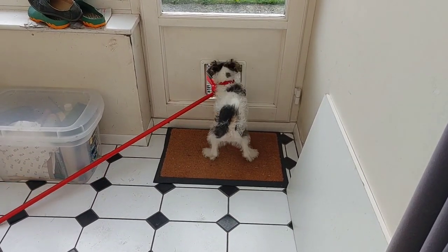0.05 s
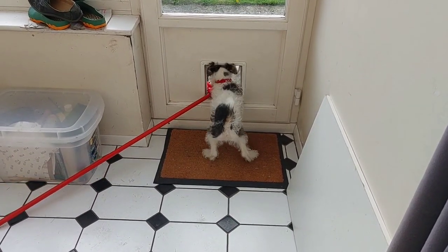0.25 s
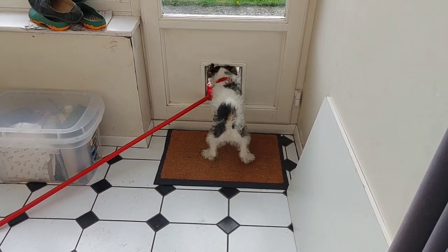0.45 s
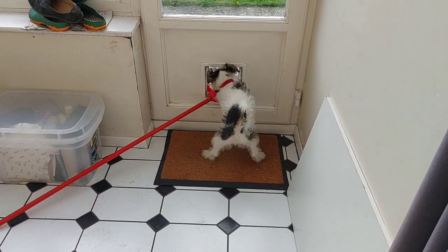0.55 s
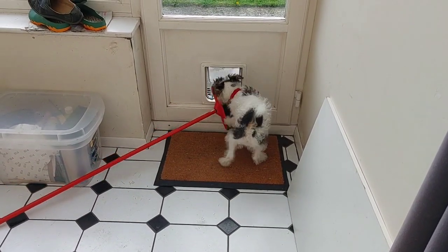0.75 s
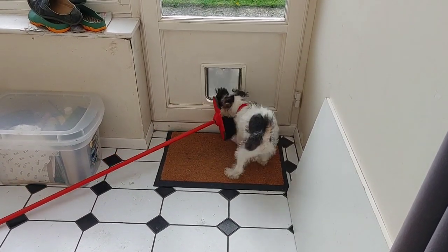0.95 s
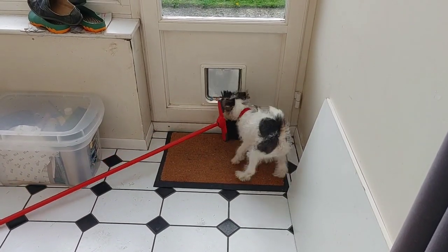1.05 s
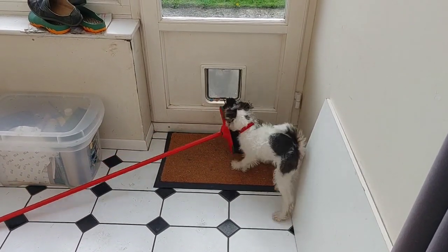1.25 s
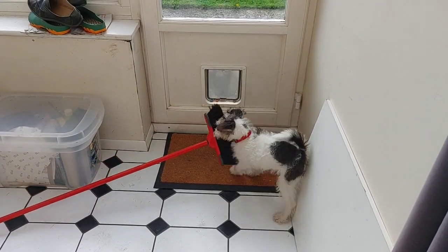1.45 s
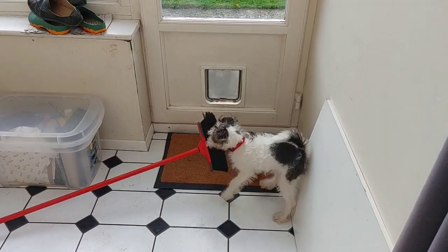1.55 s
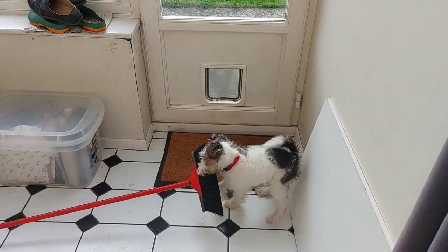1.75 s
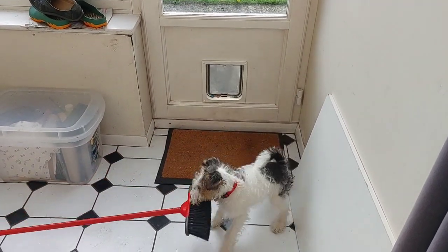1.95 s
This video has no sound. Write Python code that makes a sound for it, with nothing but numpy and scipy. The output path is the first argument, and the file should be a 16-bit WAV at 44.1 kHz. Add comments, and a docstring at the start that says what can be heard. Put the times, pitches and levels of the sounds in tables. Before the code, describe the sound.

Knocks, thuds and scuffs of a puppy tussling with a broom beside a pet flap.

```python
"""In a small tiled porch, a puppy wrestles a broom. The plastic pet flap slams and rattles in its door,
paws and body thud on the mat and wall, and each shove sets off a low boom. Bristles scuff, fur rubs,
and the broom clacks on the tiles so that its hollow handle rings. Blows are bursts of noise plus
fading tones; scuffs are thousands of tiny snaps. The hard little room echoes after every blow."""
import sys
import numpy as np
from scipy import signal
from scipy.fft import rfft, irfft, next_fast_len
from scipy.io import wavfile

SR = 44100
rng = np.random.default_rng(int(sys.argv[2]) if len(sys.argv) > 2 else 0)


def log_audio(samples):
    """Write samples as a 16-bit WAV file to the path given in sys.argv[1]."""
    # one column per channel
    frames = np.atleast_2d(samples).T
    # limit to full scale, then quantise
    limited = np.clip(frames, -1, 1)
    pcm = np.round(limited * 32767).astype(np.int16)
    wavfile.write(sys.argv[1], SR, pcm)


N = 88200
T = np.arange(SR) / SR  # one second of time, the length of one blow

# A COLOUR says how strong each pitch is in a noise. A decay is the time taken to fade by 60 dB.
# TONES are the notes a struck thing rings with; ring() shortens their base decay.
# the flap hits its frame: start_s, level_db, bass_db, treble_db, door_ring_db
FLAP_KNOCKS = [(0.201, -34, -6, -5, -50), (.205, -18, 3, 2, -22), (.259, -33.5, 11, 4, -21.5),
               (.484, -45.5, 4.5, -20, -48.5), (0.607, -45.5, 5, -30, -60), (.657, -33, -23, -13.5, -60)]
# the flap's plastic crack: pitch_hz, level_db
FLAP_COLOUR = [(30, -22), (110, -2), (165, -3.5), (230, 3), (330, -1.5), (410, -2.5), (500, -0.5),
               (640, -3), (900, -5), (1350, -3), (2150, -4), (2700, -14.5), (4100, -13), (6000, -22.5),
               (7600, -16), (10000, -27), (15500, -25)]
# the door's short thump: pitch_hz, level_db, base_decay_s
THUMP_TONES = [(179, -2.5, .08), (233, -2, 0.046), (346, -12, 0.021), (492.5, -4, 0.065)]
# the door's longer ring: pitch_hz, level_db, base_decay_s
DOOR_TONES = [(220.2, 5, 0.24), (236, -0.5, 0.49), (273.6, -4, .5), (397, -8.5, 0.85), (468, -14.5, 0.59),
              (1297, -14, 0.29), (1388, -25, 0.37), (1586, -31, 0.3), (1740, -10.5, 0.17),
              (1825, -18.5, 0.38), (1860, -23, 0.16), (2015, -17, 0.16)]
# soft bumps of paws, body and broom head: start_s, level_db, mid_db, treble_db, rise_s
BUMPS = [(0.117, -37, -25, -13, 0.007), (0.187, -33.5, -26, -6, 0.0071), (.69, -33.5, -3, -1, 0.0027),
         (.85, -33.5, 5, -9, 0.0023), (0.899, -33.5, -13.5, -6, 0.0019), (1.071, -36.5, 6.5, -9.5, 0.0055),
         (1.127, -52.5, -1, 2, 0.0048), (1.201, -39.5, 4.5, -20, 0.0021), (1.359, -40.5, 11, 5.5, 0.0014),
         (1.368, -35, -18, 13, 0.0016), (1.516, -26, -4.5, -40, 0.0062), (1.537, -24.5, -13, -11, .001),
         (1.558, -34.5, -9, -12, .002)]
# a bump's dull thud: pitch_hz, level_db
BUMP_COLOUR = [(30, -35), (65, -1), (115, -1.5), (155, -0.5), (190, -5), (240, 0), (315, 4.5), (380, -8.5),
               (550, -6.5), (850, -10.5), (1400, -15), (2000, -18), (2700, -23), (4200, -31), (6000, -48),
               (15000, -77)]
# the puppy backs into the wall panel: start_s, level_db
WALL_HITS = [(1.363, -35.5), (1.517, -23)]
# the wall panel's ring: pitch_hz, level_db, base_decay_s
WALL_TONES = [(114, -14, 0.27), (128.3, -5.5, 0.83), (155, 0.5, 0.21), (222.6, -4.5, 0.86),
              (244.3, -9, 0.92), (308, -4, 0.1), (315.7, 2.5, 0.29)]
# door and floor boom under the puppy's weight: start_s, level_db, pitch_hz
BOOMS = [(0.196, -23, 55), (0.299, -30, 53.6), (0.469, -36.5, 51), (0.601, -31, 57.2), (0.661, -47, 58),
         (.895, -35, 63.3), (1.067, -31.5, 54.3), (1.187, -30.5, 54.7), (1.359, -23.5, 69.7),
         (1.403, -16, 57.3), (1.523, -18, 63.6), (1.587, -29, 61.7), (1.707, -30.5, 71.9)]
# the broom hits the tiles: start_s, level_db, handle_ring_db, treble_db
BROOM_CLACKS = [(1.673, -30, -30.5, 0), (1.716, -33.5, -30, -10), (1.734, -35, -31.5, 0),
                (1.96, -69, -74, 16), (1.988, -55.5, -66, 13)]
# the broom's hard clack: pitch_hz, level_db
BROOM_COLOUR = [(60, 4.5), (300, -0.5), (800, 2), (1500, 0), (2300, -6), (3400, -0.5), (4500, -0.5),
                (5900, -12.5), (7500, -6), (10500, -7), (15500, -6.5)]
# the hollow handle's ring: pitch_hz, level_db, base_decay_s
HANDLE_TONES = [(420.5, -6, 0.24), (755, -2, 0.23), (1084.6, -0.5, .3), (1101, -6, 0.31),
                (1137, -12.5, 0.41), (1524, -8, 0.42), (1926, -9, 0.17), (2000, -11, 0.17),
                (2400, -21, 0.49), (2764, -23, 0.17), (2993, -16, 0.47), (3480, -13, 0.32),
                (4226, -10.5, 0.14)]
# the plastic broom head's ring: pitch_hz, level_db, base_decay_s
HEAD_TONES = [(521, -10, 0.5), (1384, 3.5, 0.062), (1435, 2, 0.062), (1960, -9.5, 0.11)]
# bristle strokes: start_s, length_s, level_db
BRISTLE_STROKES = [(-.03, 0.069, -50.5), (0.089, 0.13, -55.5), (0.654, 0.18, -55), (0.841, 0.066, -35),
                   (0.875, 0.27, -50), (1.143, 0.28, -60.5), (1.262, 0.22, -53), (1.398, 0.37, -46.5),
                   (1.794, .07, -46)]
# the bristles' bright swish: pitch_hz, level_db
BRISTLE_COLOUR = [(150, -2), (600, -19.5), (1500, -4), (2500, 0.5), (4200, 2.5), (5900, -3), (8000, -1),
                  (10500, -3.5), (15500, 2.5)]
# paws scrape the rough mat: start_s, length_s, level_db
PAW_STROKES = [(.58, 0.12, -62), (.765, .13, -41), (.92, 0.14, -49.5), (1.1, 0.098, -51),
               (1.22, 0.093, -54), (1.4, .06, -51.5)]
# the mat's rasp: pitch_hz, level_db
MAT_COLOUR = [(150, -20), (350, 3.5), (560, 6.5), (900, 4), (1400, 5), (2000, -3.5), (2800, -9.5),
              (4200, -12), (6000, -15.5), (15000, -36)]
# fur and paws rub on door and mat: time_s, level_db
RUB_LEVELS = [(0, -47.5), (0.082, -54), (.16, -48.5), (.42, -45.5), (.6, -43.5), (.8, -44), (1, -53),
              (1.298, -52.5), (1.6, -38), (1.799, -47.5), (1.9, -71), (2, -90)]
# the rumble of rubbing: pitch_hz, level_db
RUB_COLOUR = [(30, -37), (60, -4.5), (110, -7.5), (170, -4.5), (230, 1.5), (320, -1.5), (420, -19.5),
              (800, -18.5), (1600, -24), (3000, -30.5), (8000, -47)]
# the quiet of the house: pitch_hz, level_db
HOUSE_COLOUR = [(25, -57), (70, 66), (250, -11), (600, -42), (2000, -51), (6000, 11), (15000, 27)]
# how long the porch echoes: pitch_hz, decay_s
ROOM_DECAY = [(60, 0.48), (260, 0.49), (700, 0.48), (1800, 0.49), (4800, .48), (8000, 0.37), (15000, 0.36)]
# how alike left and right are (1 is the same, 0 unrelated): pitch_hz, likeness
STEREO_LIKENESS = [(60, 0.96), (250, 0.83), (500, 0.73), (1000, 0.059), (4000, 0), (15000, 0.022)]
# how much louder the left side is: pitch_hz, left_over_right_db
BALANCE = [(60, 2.5), (250, 1), (700, 2.5), (2000, 1.5), (6000, 1.2), (13000, 4.5)]


def flap(direct_db=0.5, thump_db=9.5):
    """The flap cracks against its frame; the door thumps and rings on."""
    out = np.zeros((2, N))
    for start_s, db, bass_db, treble_db, ring_db in FLAP_KNOCKS:
        boosts = [(300, bass_db), (600, 0.0048), (1600, 0.0044), (9000, treble_db)]
        crack = blow(FLAP_COLOUR, boosts, direct_db) + amp(treble_db) * edge_snap()
        thump = amp(thump_db) * ring(THUMP_TONES)
        add(out, start_s, amp(db) * (crack + thump) + amp(ring_db) * ring(DOOR_TONES))
    return out


def edge_snap(gain_db=-2.5):
    """The flap's hard plastic edges meet with a very short, bright snap."""
    hiss = unit(cut_bass(stereo_noise(SR), below_hz=5960))
    return amp(gain_db) * fade(decay_s=0.013) * hiss


def bumps():
    """Soft things land with a gentle start; two hits set the wall panel ringing."""
    out = np.zeros((2, N))
    for start_s, db, mid_db, treble_db, rise_s in BUMPS:
        boosts = [(480, 0), (1300, mid_db), (1800, mid_db), (6000, mid_db + treble_db)]
        thud = blow(BUMP_COLOUR, boosts, direct_db=7)
        add(out, start_s, amp(db) * thud * (1 - np.exp(-T / rise_s)))
    for start_s, db in WALL_HITS:
        add(out, start_s, amp(db) * ring(WALL_TONES))
    return out


def booms(rise_s=0.02, decay_s=0.34):
    """The room's lowest note swells and dies after each shove."""
    out = np.zeros(N)
    swell = (1 - np.exp(-(T / rise_s) ** 2)) * fade(decay_s)
    for start_s, db, hz in BOOMS:
        add(out, start_s, amp(db) * swell * np.sin(2 * np.pi * hz * T))
    return out


def broom(tap_s=0.658, tap_db=-29.5):
    """The head taps the flap frame, later clacks on the tiles, and the hollow handle rings."""
    out = np.zeros((2, N))
    for start_s, db, ring_db, treble_db in BROOM_CLACKS:
        clack = blow(BROOM_COLOUR, [(3000, 0.0068), (9000, treble_db)], direct_db=1)
        add(out, start_s, amp(db) * clack + amp(ring_db) * ring(HANDLE_TONES))
    add(out, tap_s, amp(tap_db) * ring(HEAD_TONES))
    return out


def scuffs():
    """The broom's bristles swish and paws scrape the mat."""
    bristles = strokes(BRISTLE_STROKES, BRISTLE_COLOUR, direct_db=-8)
    paws = strokes(PAW_STROKES, MAT_COLOUR, direct_db=-5.5)
    return bristles + paws


def strokes(rows, colour, direct_db, snaps_per_s=6000, spread_db=8):
    """Each stroke is a crowd of tiny fibre snaps that grows louder, then softer."""
    t = np.arange(N) / SR
    effort = sum(amp(db) * np.sin(np.pi * np.clip((t - start_s) / length_s, 0, 1))
                 for start_s, length_s, db in rows)
    snaps = (rng.random(N) < snaps_per_s / SR) * rng.standard_normal(N)
    snaps *= amp(spread_db * rng.standard_normal(N))
    swish = effort * coloured(snaps, colour)
    return amp(direct_db) * swish + echo(swish)


def rubbing():
    """Fur and paws make a dull rumble while the puppy pushes about."""
    level_db = np.interp(np.arange(N) / SR, *np.transpose(RUB_LEVELS))
    return amp(level_db) * coloured(stereo_noise(N), RUB_COLOUR)


def quiet_house(level_db=-80):
    """A faint, steady, low noise behind everything."""
    return amp(level_db) * coloured(stereo_noise(N), HOUSE_COLOUR)


def blow(colour, boosts, direct_db):
    """A short crack and its echo, coloured by the thing struck and by (pitch_hz, gain_db) boosts."""
    hz = np.fft.rfftfreq(SR, 1 / SR)
    gain = unit(amp(along(colour, hz))) * amp(along(boosts, hz))
    # build a filter from these gains that makes no sound before the hit
    cepstrum = irfft(np.log(gain), SR)
    cepstrum[1:SR // 2] *= 2
    cepstrum[SR // 2 + 1:] = 0
    body = irfft(np.exp(rfft(cepstrum)), SR)
    hit = room() + amp(direct_db) * fade(decay_s=0.017) * stereo_noise(SR)
    return signal.fftconvolve(hit, body[None], axes=1)[:, :SR]


def ring(rows, scatter_db=1, room_db=-3, rise_s=0.0044):
    """A struck thing rings with fading tones; the room blurs the higher ones."""
    def tones(decay_scale):
        return sum(amp(db + scatter_db * rng.normal()) * fade(base_decay_s * decay_scale)
                   * np.sin(2 * np.pi * hz * T) for hz, db, base_decay_s in rows)
    blur = cut_bass(echo(tones(decay_scale=0.56)), below_hz=493)
    return (tones(decay_scale=0.8) + amp(room_db) * blur) * (1 - np.exp(-T / rise_s))


def room():
    """A fresh echo of the porch: noise whose treble dies soonest."""
    hz, t, spectrum = signal.stft(stereo_noise(SR), SR, nperseg=256)
    spectrum = spectrum * amp(-60 * t / along(ROOM_DECAY, hz)[:, None])
    return signal.istft(spectrum, SR, nperseg=256)[1][:, :SR]


def echo(x):
    """The room's answer to x, about equally strong."""
    tail = room()
    return signal.fftconvolve(x[None], tail / np.linalg.norm(tail[0]), axes=1)[:, :len(x)]


def stereo_noise(size):
    """White noise, with left and right alike in the bass and unrelated in the treble."""
    def shares(hz):
        angle = np.arccos(np.clip(along(STEREO_LIKENESS, hz), -1, 1)) / 2
        return np.array([np.cos(angle), np.sin(angle)])
    mid, side = filtered(rng.standard_normal((2, size)), shares)
    return np.array([mid + side, mid - side])


def coloured(x, colour):
    """Give x a colour and an average strength of 1."""
    return unit(filtered(x, lambda hz: amp(along(colour, hz))))


def cut_bass(x, below_hz):
    """Gently turn down the low pitches."""
    return filtered(x, lambda hz: hz ** 2 / (hz ** 2 + below_hz ** 2))


def filtered(x, gain):
    """Turn each pitch in x up or down by gain(hz)."""
    n = x.shape[-1]
    padded = next_fast_len(n + SR // 2)
    return irfft(rfft(x, padded) * gain(np.fft.rfftfreq(padded, 1 / SR)), padded)[..., :n]


def fade(decay_s):
    """Fade by 60 dB in decay_s seconds."""
    return amp(-60 * T / decay_s)


def amp(db):
    """Turn decibels into a multiplier."""
    return 10 ** (np.asarray(db) / 20)


def unit(x):
    """Scale to an average strength (rms) of 1."""
    return x / np.sqrt(np.mean(x ** 2) + 1e-20)


def along(points, hz):
    """Read between (pitch_hz, value) points, with octaves evenly spaced."""
    pitches, values = np.transpose(points)
    return np.interp(np.log(hz + 1), np.log(pitches + 1), values)


def add(out, start_s, x):
    """Mix x into out from start_s on."""
    i = max(round(start_s * SR), 0)
    out[..., i:i + x.shape[-1]] += x[..., :max(N - i, 0)]


def scene():
    """The whole tussle over the quiet of the house."""
    return flap() + bumps() + booms() + broom() + scuffs() + rubbing() + quiet_house()


def record(dry):
    """The left microphone hears a little more; nothing passes above top_hz."""
    top_hz = 15850
    return filtered(dry, lambda hz: amp(np.outer([.5, -.5], along(BALANCE, hz))) * (hz < top_hz))


dry = scene()
out = record(dry)
log_audio(out)
```